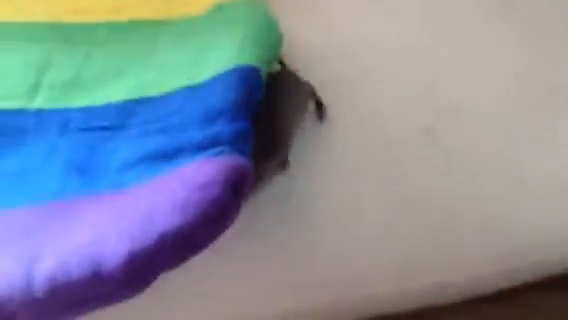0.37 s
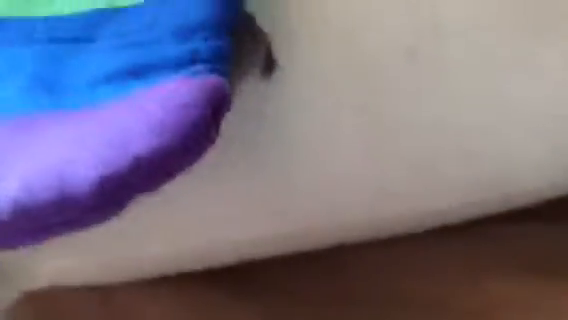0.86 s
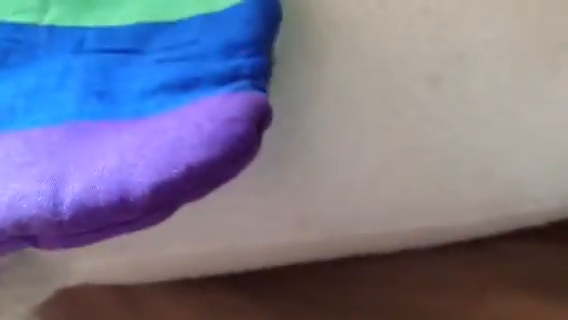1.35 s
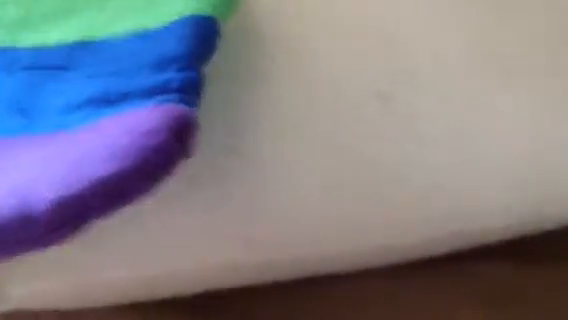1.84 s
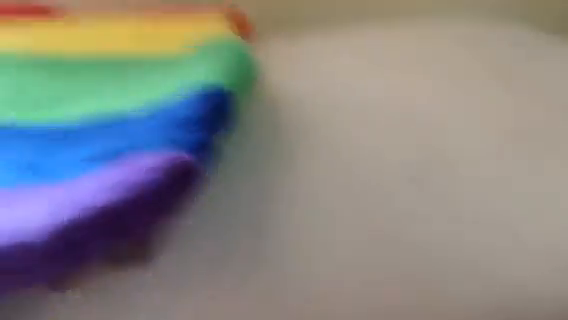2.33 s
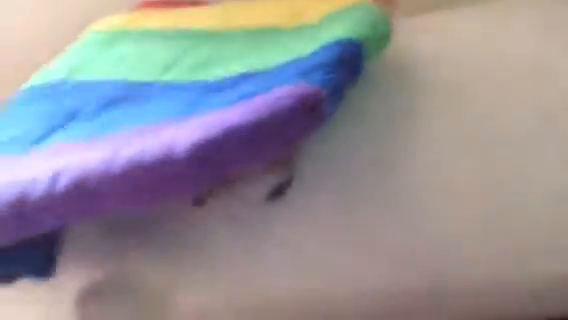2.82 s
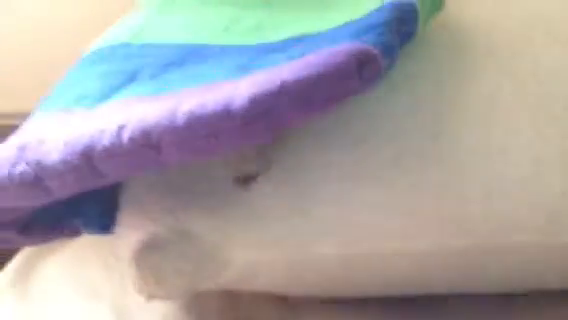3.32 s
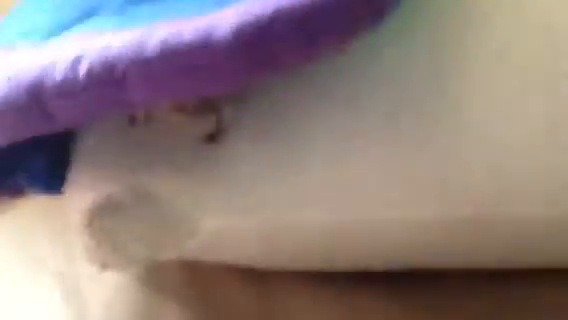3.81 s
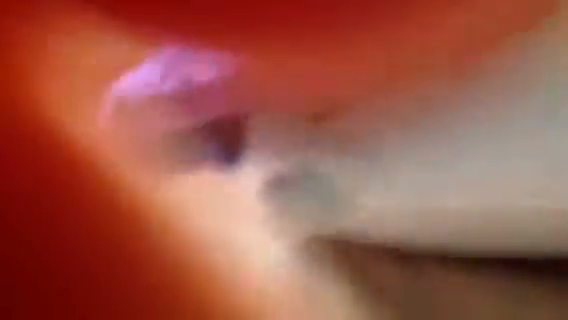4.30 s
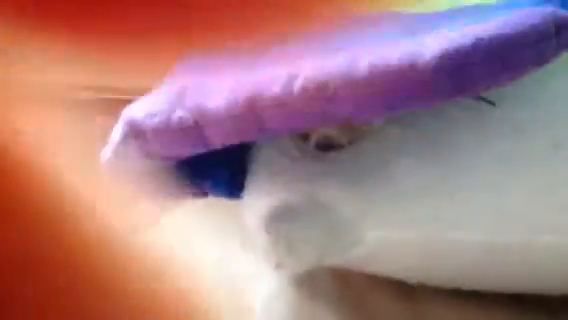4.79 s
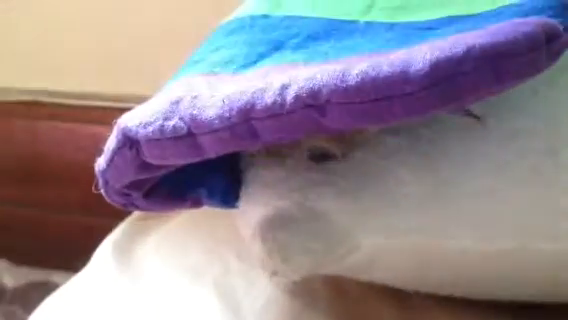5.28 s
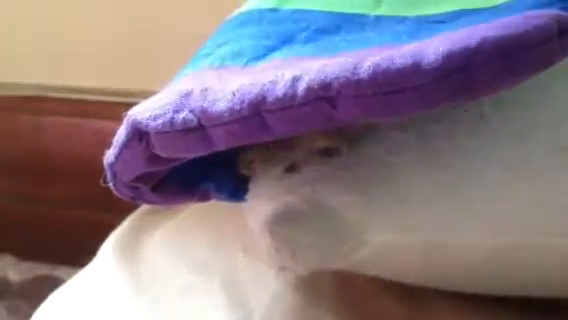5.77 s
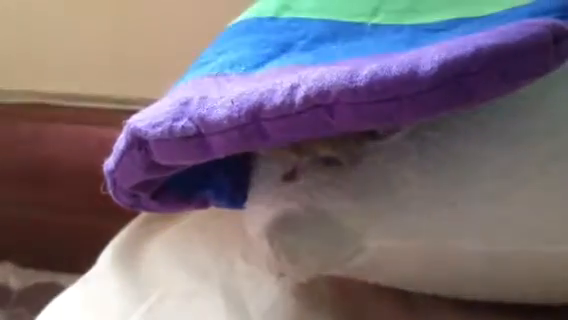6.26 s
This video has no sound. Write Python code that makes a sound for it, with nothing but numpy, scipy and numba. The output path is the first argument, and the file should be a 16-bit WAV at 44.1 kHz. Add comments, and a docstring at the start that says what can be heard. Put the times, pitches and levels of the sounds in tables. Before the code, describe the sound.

Very close, dry rustling and scraping on a plastic case, broken by irregular hard knocks and tiny brittle ticks. The first strong knocks arrive within the first second, a denser cluster follows after two seconds, then scattered ticks, another small burst and soft rubbing. The microphone is touched directly; the quiet indoor room adds only faint rumble and hiss, which remain alone at the end.

```python
"""A hand-held phone in a quiet room follows a pet mouse burrowing under a pillow; its own handling is loudest.
From the first moment fingers and cloth slide over the case in short strokes, made of dense friction grains.
Taps fall among them, dull thumps and sharp clicks that ring the case modes; hard ones come from 0.4 s.
Near 3.9 s cloth slides faintly, a smooth airy band; just before 5 s the last touches stop.
Below it all, and alone at the end, lie a faint room rumble and the microphone's hiss: steady coloured noise."""
import sys
import numpy as np
from scipy import signal
from scipy.fft import rfft, irfft, next_fast_len
from scipy.io import wavfile
from numba import njit

SR = 44100
rng = np.random.default_rng(int(sys.argv[2]) if len(sys.argv) > 2 else 0)


def ratio(d):
    """dB to gain"""
    e = np.asarray(d, float) / 20
    return 10 ** e


def unload_wav(signal):
    """Save mono or channel-first audio to the path in sys.argv[1] as 16-bit WAV at rate SR, clipped to [-1, 1]."""
    wavfile.write(
        sys.argv[1],
        SR,
        np.round(np.clip(np.atleast_2d(signal).T, -1, 1) * 32767).astype(np.int16),
    )


N = 282019   # samples


def rms_one(x):
    """Scale to unit rms."""
    return x / np.sqrt(np.mean(x ** 2) + 1e-20)


def drift(rate_hz):
    """Slow chance of spread 1: noise at every 20th sample through a double one-pole."""
    pole = np.exp(-2 * np.pi * rate_hz * 20 / SR)
    noise = rng.standard_normal(N // 20 + 2002)
    slow = signal.lfilter([1], [1, -2 * pole, pole * pole], noise)[2000:]   # past the filter's onset
    return np.interp(np.arange(N) / 20, np.arange(len(slow)), rms_one(slow))


@njit
def glide(x, radius, turn):
    """A resonance whose pole radius and angle (given as its cosine) change sample by sample."""
    y = np.zeros(len(x))
    for i in range(2, len(x)):
        drive = (1 - radius[i] ** 2) / 2 * (x[i] - x[i - 2])
        y[i] = drive + 2 * radius[i] * turn[i] * y[i - 1] - radius[i] ** 2 * y[i - 2]
    return y


def resonate(x, peaks, centre=1):
    """Parallel resonances with alternating signs, pitch and width scaled by a centre that may move; rms 1."""
    out, centre = 0, centre * np.ones(N)
    for k, (pitch, width, level_db) in enumerate(peaks):
        hz = np.minimum(pitch * centre, SR / 2.2)
        radius = np.exp(-np.pi * width * centre / SR)
        out = out + (-1) ** k * ratio(level_db) * glide(x, radius, np.cos(2 * np.pi * hz / SR))
    return rms_one(out)


def friction(peaks, centre, per_s, spread_db, flutter_db, flutter_hz):
    """Fibres catch and let go: random grains of uneven size, fluttering in strength, heard through resonances."""
    sizes = ratio(spread_db * np.minimum(rng.exponential(1, N), 5)) * rng.choice([-1, 1], N)
    struck = rng.random(N) < per_s / SR
    grains = sizes * struck / np.sqrt(centre) + 1e-18   # wider peaks pass more power
    once = resonate(grains, peaks, centre)
    twice = resonate(once, peaks, centre)   # steep skirts
    return rms_one(twice * ratio(flutter_db * drift(flutter_hz)))


HUMP_DB = 9   # drop after one swell or fade time
SWELL_SQUARENESS, FADE_SQUARENESS = 1.7, 1.47   # a higher power holds longer, then drops faster


def humps(t, crest, swell, fade, level_db):
    """Gain of overlapping humps, added in power."""
    power = np.full(len(t), 1e-14)
    for at, rise, fall, top_db in zip(crest, swell, fade, level_db):
        before = np.clip((at - t) / max(rise, .002), 0, 5)
        after = np.clip((t - at) / max(fall, .002), 0, 5)
        drop_db = HUMP_DB * (before ** SWELL_SQUARENESS + after ** FADE_SQUARENESS)
        power += ratio(top_db - drop_db) ** 2
    return np.sqrt(power)


# Colour of the quiet room and the microphone's hiss. Each row: pitch in Hz, relative density in dB per Hz.
ROOM_COLOUR = [(18, -68), (30, -25), (48, -26), (71, -17), (202, -2.5), (299, -11), (410, -7.5), (532, -19),
               (591, -14), (921, -14.5), (1020, -15.5), (2070, -20.5), (3320, -22), (4780, -23),
               (15500, -25)]
ROOM_DB = -62.5   # rms of the noise before its low bands waver


def room_tone():
    """Steady noise with the colour of the room; the low bands waver slowly."""
    size = next_fast_len(N)
    hz = np.maximum(np.arange(size // 2 + 1) * SR / size, 1)
    colour_hz, colour_db = np.transpose(ROOM_COLOUR)
    shape = ratio(np.interp(np.log(hz), np.log(colour_hz), colour_db))
    noise = rms_one(irfft(rfft(rng.standard_normal(size)) * shape, size)[:N])
    low = signal.sosfilt(signal.butter(2, 1300, fs=SR, output="sos"), noise)
    waver = low * (ratio(0.97 * drift(7.4)) - 1)
    whine = ratio(-10) * resonate(rng.standard_normal(N), [(927, 83, 0)])   # a distant appliance band
    return ratio(ROOM_DB) * (noise + waver + whine)


# Faint slides of cloth. Each row: crest in seconds, swell in seconds, fade in seconds, level in dB.
CLOTH_SLIDES = [(3.86, 0.14, 0.075, -68), (3.98, 0.11, .16, -68)]
# Their airy resonances, before tuning by 0.99 and passed twice.
# Each row: pitch in Hz, width in Hz, level in dB per pass.
CLOTH_PEAKS = [(4660, 850, 0), (6100, 710, -1.5)]


def slide():
    """Cloth drawn lightly over cloth: a smooth band of air-like hiss."""
    gain = humps(np.arange(N) / SR, *np.transpose(CLOTH_SLIDES))
    return gain * friction(CLOTH_PEAKS, 0.99, 9200, 2.5, 0.8, 30)


# Strokes over the case. Each row: crest in seconds, swell in seconds, fade in seconds, speed as hiss in dB,
# brightness as sizzle over hiss in dB, rasp in dB, pressure as rumble in dB.
STROKE_ROWS = [(.054, 0.0087, .03, -58, -5, -53, -69), (.082, 0.028, 0.053, -56, -3, -57.5, -63.5),
               (.19, 0.036, 0.08, -69, -4, -75, -78), (.312, 0.024, 0.026, -62, -10, -76, -80),
               (.39, 0.011, 0.039, -48.5, -7, -48.5, -53.5), (.445, 0.049, 0.046, -53.5, 2.5, -47.5, -47.5),
               (.52, 0.026, 0.036, -54.5, -9, -47, -44.5), (0.554, 0.031, 0.013, -45.5, -9, -42, -42),
               (.588, 0.0069, 0.04, -53, -12, -53.5, -59), (.672, 0.017, 0.047, -54.5, -6, -54.5, -55),
               (.785, .07, 0.022, -54, -3.5, -54.5, -69), (.835, 0.017, 0.017, -64, -6, -54, -73),
               (0.961, 0.0055, 0.016, -54, -8, -45, -67.5), (1.005, 0.014, 0.025, -61, -6, -54.5, -69),
               (1.085, 0.042, 0.089, -59.5, -8, -54.5, -65), (1.193, 0.012, .03, -57.5, -7, -60, -70),
               (1.22, 0.028, 0.085, -58, -9, -61.5, -72), (1.325, 0.025, 0.042, -58.5, -5, -52.5, -66),
               (1.375, 0.038, 0.028, -60, -7, -67, -73), (1.47, 0.088, .08, -69, 0, -67, -82.5),
               (1.662, 0.011, 0.092, -65, -1, -54, -65), (1.759, 0.081, 0.059, -59.5, -10, -60.5, -67),
               (1.948, 0.013, 0.055, -56, -15, -51.5, -68.5), (2.031, 0.045, 0.13, -51, -13, -54, -55),
               (2.169, 0.18, 0.057, -53.5, -4, -57.5, -57), (2.317, .006, .03, -51.5, 1, -58, -56),
               (2.352, 0.023, 0.074, -49.5, -3.5, -52, -46), (2.43, 0.083, .05, -52, -10, -50, -60.5),
               (2.513, 0.068, 0.019, -45.5, 0.5, -53.5, -42), (2.57, .02, 0.027, -66, -7, -76, -70),
               (2.625, 0.019, 0.13, -59.5, -6, -75, -57.5), (2.765, 0.062, 0.072, -56.5, -4, -50.5, -46),
               (2.845, 0.064, .04, -54, 0.5, -50.5, -41), (2.895, 0.081, 0.059, -56, -3, -57.5, -52.5),
               (2.976, 0.03, 0.0084, -58.5, 12, -49, -50), (3.004, 0.025, 0.057, -64, 6.5, -53, -54),
               (3.3, 0.17, 0.17, -80, -3, -90, -79), (3.63, 0.017, 0.05, -56.5, 12.5, -50, -48),
               (3.67, 0.034, 0.039, -57.5, 0, -42, -52), (3.715, .03, 0.017, -53, -3, -50, -49),
               (3.75, 0.018, 0.038, -70, -1, -69, -56.5), (4.08, 0.1, 0.08, -69.5, -1, -65, -67),
               (4.201, 0.064, 0.17, -62, -3.5, -58, -60), (4.286, 0.012, 0.017, -50.5, -2, -50, -42.5),
               (4.34, 0.11, 0.12, -52.5, -4, -57, -50.5), (4.455, 0.04, 0.04, -61, -3, -62, -59),
               (4.55, .05, 0.045, -69, -5, -66, -58), (4.7, 0.11, 0.047, -67, -4, -72.5, -61.5),
               (4.749, 0.011, 0.0098, -55, -7, -48, -49), (4.763, 0.0066, 0.017, -57, -7, -56, -50),
               (4.822, 0.002, 0.007, -53, -1.5, -67, -65), (4.9, 0.087, 0.06, -65, -7.5, -75, -62),
               (4.991, 0.038, 0.014, -54.5, -3, -69, -66)]
# The changing grip. Each row: time in seconds, pitch in Hz of the hollow under the hand,
# its ring over the hiss in dB, centre of the hiss in Hz.
GRIP = [(0, 2270, -1.5, 5770), (.4, 2410, 0, 4860), (.54, 2350, -1, 5960), (.6, 2630, 2, 5300),
        (.79, 2650, -1, 6700), (1.1, 2550, 0.5, 5900), (1.76, 2540, 2.5, 5470), (2.2, 2480, -1, 6070),
        (2.42, 2230, 1.5, 5600), (2.52, 2120, 5.5, 6500), (2.68, 2240, 8.5, 5460), (2.78, 2180, 8.5, 5750),
        (2.89, 2100, 1, 6950), (3.02, 2120, 9.5, 6300), (3.5, 2380, 8.5, 5200), (3.64, 2350, 6.5, 6100),
        (3.73, 2180, -1, 7450), (4.1, 1990, 8, 5500), (4.28, 2340, -2.5, 4850), (4.5, 2450, -5.5, 5070),
        (4.75, 2480, 0, 6300), (5, 2650, -11, 6100)]
# Low resonances under pressure. Each row: pitch in Hz, width in Hz, level in dB per pass of two.
RUMBLE_PEAKS = [(128, 147, -5), (221, 131, 0.5), (366, 254, -5)]
# Resonances of the rasp, the hollow, the hiss and the sizzle.
# Each row: pitch and width as shares of the moving centre, level in dB per pass of two.
RASP_PEAKS = [(.7, 0.31, -4), (1.01, 0.28, 0), (1.5, 1, -4.5)]
HOLLOW_PEAKS = [(.7, 0.47, -7), (1.0, 0.21, -0.5), (1.28, 0.35, -7.5)]
HISS_PEAKS = [(.62, 0.53, -3), (.98, 0.41, 2.5), (1.3, 0.63, -2.5)]
SIZZLE_PEAKS = [(.82, 0.47, 1), (1.03, 0.18, 7.5), (1.38, 0.68, 0)]
SIZZLE_HZ, SIZZLE_HZ_PER_DB = 10060, 69   # brighter strokes sizzle higher
RASP_HZ, FIRM_DB = 701, -60   # rasp pitch at a firm touch
OCTAVE_DB = 40.5   # the rasp sinks an octave for each such rise in pressure


def strokes():
    """Five ranges of the friction swell and fade with each stroke; slips in the grip shake them all together."""
    crest, swell, fade, speed_db, bright_db, rasp_db, press_db = np.transpose(STROKE_ROWS)
    coarse, t = np.arange(0, N / SR + .001, .001), np.arange(N) / SR

    def gain(level_db):
        """Humps worked out every millisecond, then joined."""
        return np.interp(t, coarse, humps(coarse, crest, swell, fade, level_db))

    hiss = gain(speed_db)
    s, hollow_hz, hollow_db, hiss_hz = np.transpose(GRIP)
    hollow = hiss * ratio(np.interp(t, s, hollow_db))
    sizzle_hz = SIZZLE_HZ + SIZZLE_HZ_PER_DB * np.interp(t, crest, bright_db)
    rasp_hz = RASP_HZ * 2 ** ((FIRM_DB - np.interp(t, crest, press_db)) / OCTAVE_DB)
    # friction: resonances, centre, grains per s, size spread dB, flutter dB, flutter Hz
    sound = hiss * friction(HISS_PEAKS, np.interp(t, s, hiss_hz), 14000, 2.0, 1.44, 86)
    sound += gain(speed_db + bright_db) * friction(SIZZLE_PEAKS, sizzle_hz, 16000, 4.5, 0.97, 49)
    sound += hollow * friction(HOLLOW_PEAKS, np.interp(t, s, hollow_hz), 4000, 0.69, 0.84, 35)
    sound += gain(rasp_db) * friction(RASP_PEAKS, rasp_hz, 2500, 1.2, 2.6, 32)
    sound += gain(press_db) * friction(RUMBLE_PEAKS, 1, 900, 3.3, 1.7, 15)
    return sound * ratio(.9 * drift(52))


THUMP_FALL_DB = 15   # per octave above the lowest mode
CLICK_BELOW_DB, CLICK_ABOVE_DB = 11.5, 10.5   # fall per octave off the click's pitch


def blow_db(rows, hz):
    """Strength of each tap at one pitch: a dull thump plus a click that is strongest at its own pitch."""
    thump = ratio(rows[:, 1] - THUMP_FALL_DB * max(np.log2(hz / CASE_MODES[0][0]), 0))
    off = np.log2(hz / 1000) - rows[:, 3]   # octaves
    click = ratio(rows[:, 2] - np.where(off < 0, -CLICK_BELOW_DB, CLICK_ABOVE_DB) * off)
    return 10 * np.log10(thump ** 2 + click ** 2)


# Taps on the case. Each row: time in seconds, thump in dB and click in dB before the modes colour them,
# click pitch in octaves over 1 kHz, scuff in ms (up to 2 ms stays clean).
TAP_ROWS = [(.0478, -75, -64, 13.5, 12), (0.0714, -69.5, -38.5, 0.9, 3), (0.3065, -65.5, -50, 1.6, 6),
            (.316, -62, -46, 0.9, 4.5), (0.3388, -64, -37, 3, 2), (.375, -22.5, -26, -0.4, .5),
            (0.3861, -31, -27, 2.5, 0), (.395, -32, -27.5, 1.5, 0), (0.4055, -44, -33, 2.8, 0),
            (0.4839, -47, -32, 3, 0), (0.4911, -30, -45, 2, 0), (.511, -29, -39, -1.5, 8.5),
            (0.6154, -17, -13.5, -0.86, 0), (0.643, -66, -38, 3, 2.5), (.667, -58, -44, .8, 13),
            (0.774, -80, -37.5, 1.7, 15), (.8271, -70, -35, 2, 0), (.8373, -66, -40, 3.5, 0),
            (.914, -38.5, -30, -0.64, 0), (0.958, -43, -41, 0.2, 15), (1.1666, -38, -32, 2, 0),
            (1.187, -58, -39.5, .7, 8), (1.3141, -42, -35, -0.8, 4.5), (1.431, -53, -45, 2, 0),
            (1.6568, -42, -45.5, 1, 6.5), (1.928, -56, -46, -.1, 0), (1.9375, -79, -31, 1.9, 5),
            (1.943, -73, -25.5, 2.7, 0), (2.0253, -57, -27, 1.1, -6), (2.0349, -29, -27, 1.83, 6),
            (2.1124, -32.5, -38, 0.5, .5), (2.3135, -23, -23.5, 0.5, .5), (2.3504, -20, -27, 0.8, 0),
            (2.352, -60, -31, 5, 0.5), (2.3855, -31, -39, 0.7, -4), (2.4512, -28, -24.5, -1.03, 3.5),
            (2.4735, -29.5, -29.5, 1.5, 2.5), (2.4906, -21.5, -29, -0.6, 11), (2.569, -72, -41, 2.2, 2),
            (2.594, -29, -60, 3.1, 5), (2.612, -34, -41, 3.5, 7), (2.6362, -29.5, -37.5, 3.5, 3.5),
            (2.6559, -22, -17, 0.48, 0), (2.9761, -30.5, -19, 0.94, 0), (2.9806, -55, -25.5, 2.9, .5),
            (3.078, -37, -48, 2, 0), (3.0928, -40, -34, 1.4, 0), (3.179, -67, -41, 2.3, 0),
            (3.27, -74, -48, 3.5, 0), (3.2937, -35.5, -42, 0.5, 8), (3.4732, -72, -42.5, 2.5, 0),
            (3.512, -74, -46, 2.3, 0), (3.562, -74, -46, 2, 0), (3.5932, -55, -41, 3, 4),
            (3.6033, -41, -28, 1.2, 0), (3.6161, -24.5, -22.5, 1.56, 0), (3.6371, -49, -23, 1.8, 0),
            (3.7222, -47, -34, 4, -1), (3.778, -47, -56, 0.2, 7), (3.8914, -47, -56, 1, 3.5),
            (4.0681, -26, -41.5, -0.85, 5), (4.208, -41, -51, 1, 4), (4.2799, -29.5, -25, -0.48, 4),
            (4.41, -67.5, -36, 8, -2), (4.745, -35.5, -36.5, -0.7, 12), (4.821, -34, -30.5, 2.8, 0),
            (4.8757, -42.5, -42, 3.5, 0), (4.8897, -51, -32.5, 4, 0), (4.9281, -50, -43, -.5, 5.5)]
# Modes of the case around the microphone. Each row: pitch in Hz, level in dB, decay by 60 dB in seconds.
CASE_MODES = [(207, -1, 0.021), (306, -12, 0.019), (620, 3.5, 0.0042), (1167, 5, 0.0026),
              (1820, 5.5, 0.0018), (2350, -3, 0.007), (4900, -8, 0.0015), (5600, -12, 0.00088),
              (7450, 10.5, 0.0007), (11100, 8.5, 0.0012)]
GRAINS = 14   # per scuffed tap


def taps():
    """Every tap strikes all case modes; a fleshy touch lasts longer and is dull, a scuffed one breaks into grains."""
    rows, out = np.array(TAP_ROWS), np.zeros(N)
    at = (rows[:, 0] * SR).astype(int)
    scuff_ms = rows[:, 4]
    scatter_db = 2.45 * rng.standard_normal((len(rows), len(CASE_MODES)))
    when = rng.random((len(rows), GRAINS)) ** 1.3   # crowded toward the start
    size = rng.uniform(-0.53, 1, (len(rows), GRAINS))
    grain_at = (at[:, None] + when * np.maximum(scuff_ms, 0)[:, None] * SR / 1000).astype(int)
    scuffed = np.clip((scuff_ms - 2) / 4, 0, 1)
    grain = 0.98 * size * (1.2 - when) * scuffed[:, None]
    # the less a touch rings against its knock, the longer the contact
    contact_ms = np.clip(0.086 * (blow_db(rows, 900) - blow_db(rows, 2550)), .1, 1.3)
    contact = (contact_ms * SR / 1000).astype(int) + 3
    for k, (hz, level_db, t60) in enumerate(CASE_MODES):
        blow = ratio(blow_db(rows, hz) + level_db + scatter_db[:, k])
        clicks = np.full(N, 1e-18)
        for i, strength, length in zip(at, blow, np.minimum(contact, int(SR / hz) + 3)):
            clicks[i:i + length] += strength * np.hanning(length) * 2 / (length - 1)
        if k > 0:   # grains leave the lowest mode alone
            np.add.at(clicks, grain_at, grain * blow[:, None])
        soft = np.exp(-2 * np.pi * min(4.2 * hz, SR / 3) / SR)   # no edge far above the mode
        clicks = signal.lfilter([(1 - soft) ** 2], [1, -2 * soft, soft ** 2], clicks)
        radius, angle = ratio(-60 / (t60 * SR)), 2 * np.pi * hz / SR
        ring = signal.lfilter([0, np.sin(angle)], [1, -2 * radius * np.cos(angle), radius ** 2], clicks)
        swing = -1 if k < 2 else 1   # the case as a whole recoils against the blow
        out += swing * ring
    return out


def scene():
    """Touches come through the mount of the microphone, which passes little deep bass; the room comes by air."""
    mount = signal.butter(3, 110, "high", fs=SR, output="sos")
    touch = signal.sosfilt(mount, strokes() + taps())
    return (touch + slide() + room_tone())[None, :]


def low_pass(x):
    """Removes everything above the highest recorded frequency."""
    return signal.sosfilt(signal.butter(12, 16370, fs=SR, output="sos"), x)


def record(dry):
    """The top is cut steeply above 15450 Hz."""
    steep = signal.ellip(10, 1, 60, 15450, fs=SR, output="sos")   # 1 dB ripple, 60 dB stop
    mix = signal.sosfilt(steep, dry)
    return low_pass(mix)


dry = scene()
out = record(dry)
unload_wav(out)
```